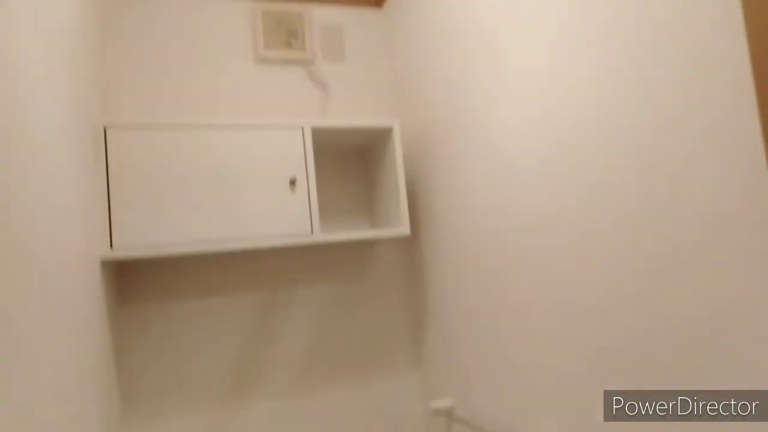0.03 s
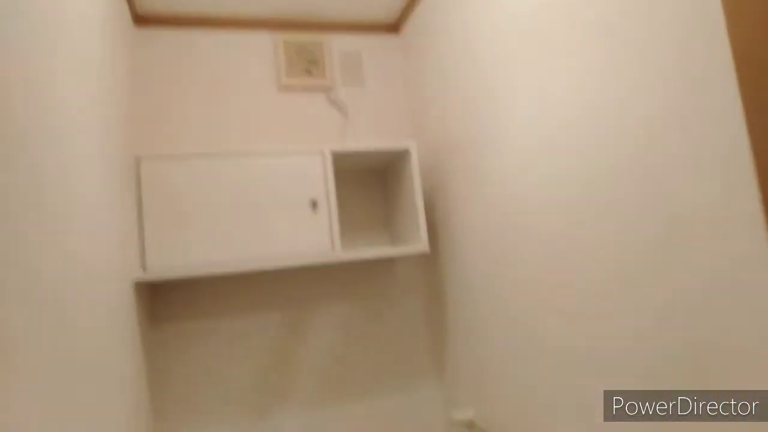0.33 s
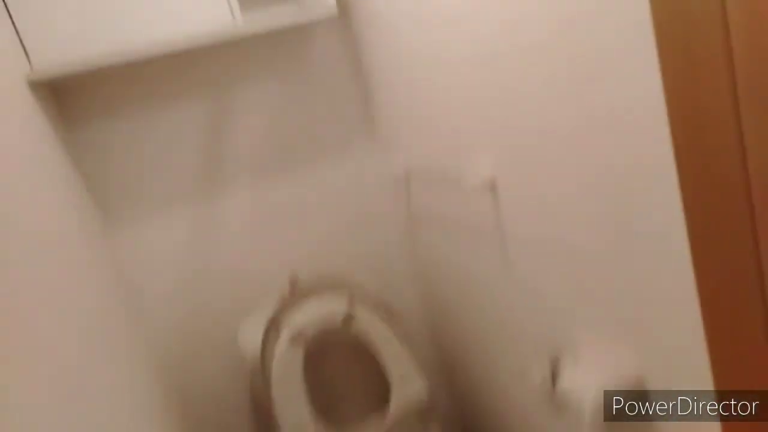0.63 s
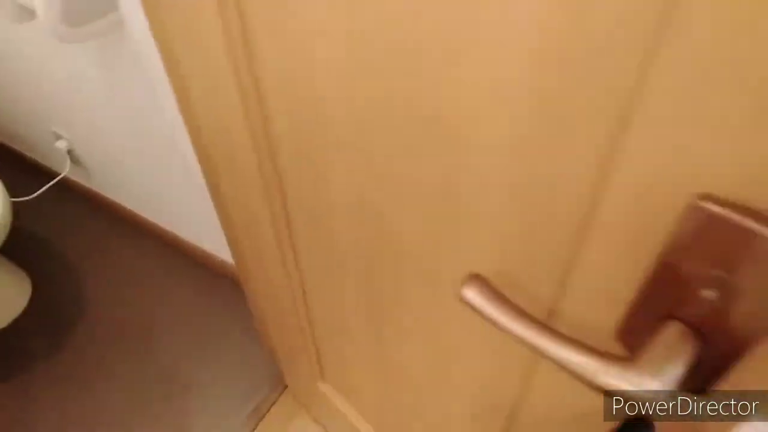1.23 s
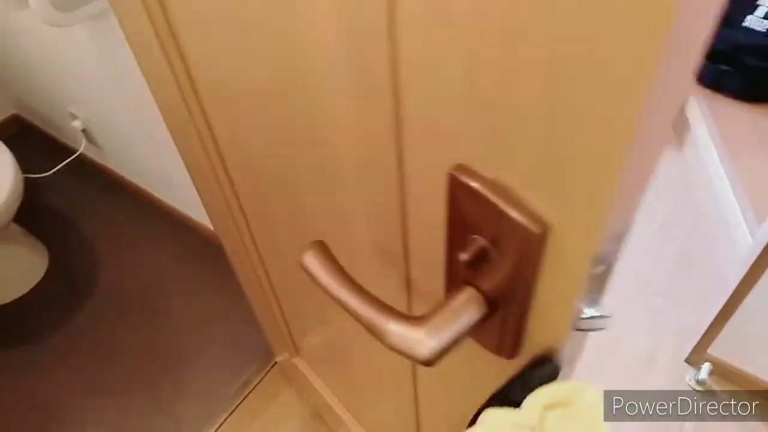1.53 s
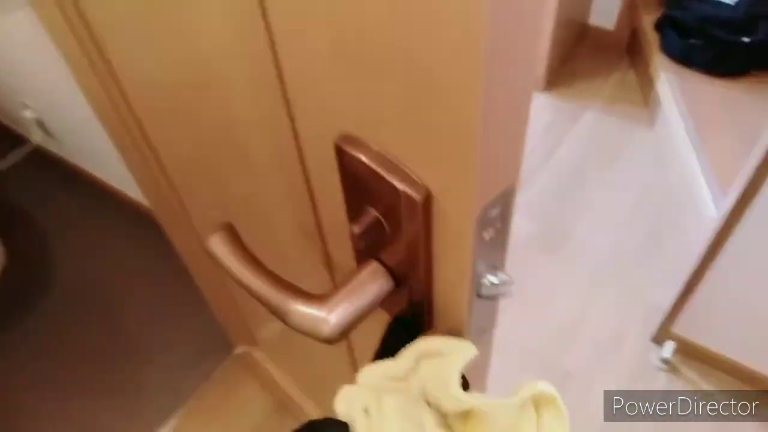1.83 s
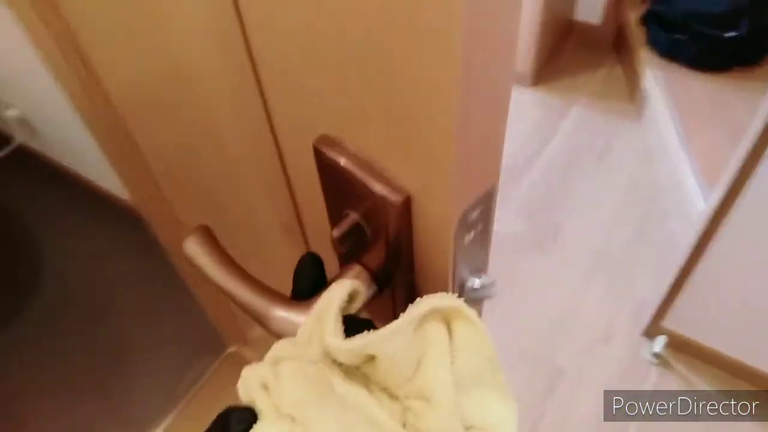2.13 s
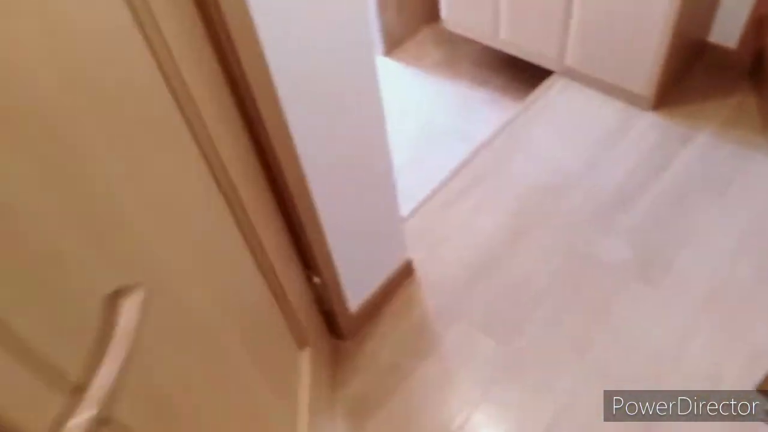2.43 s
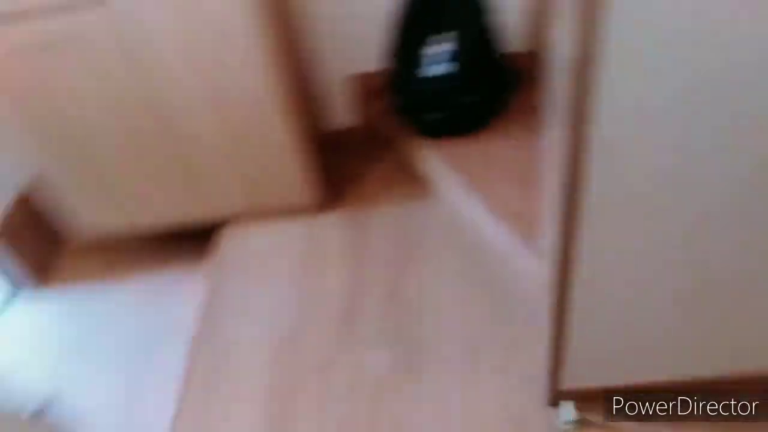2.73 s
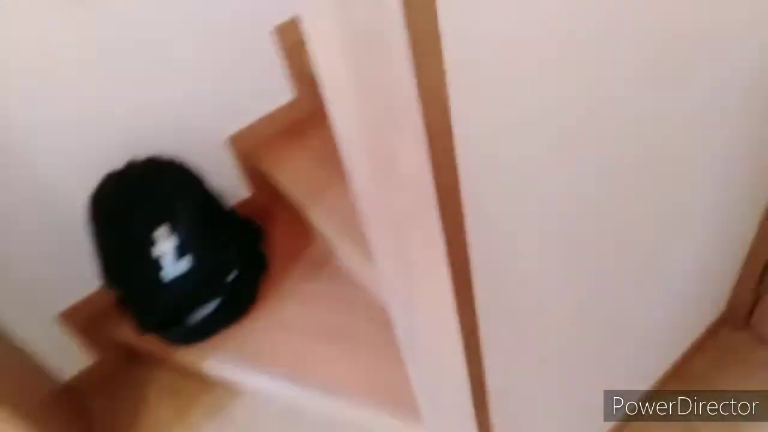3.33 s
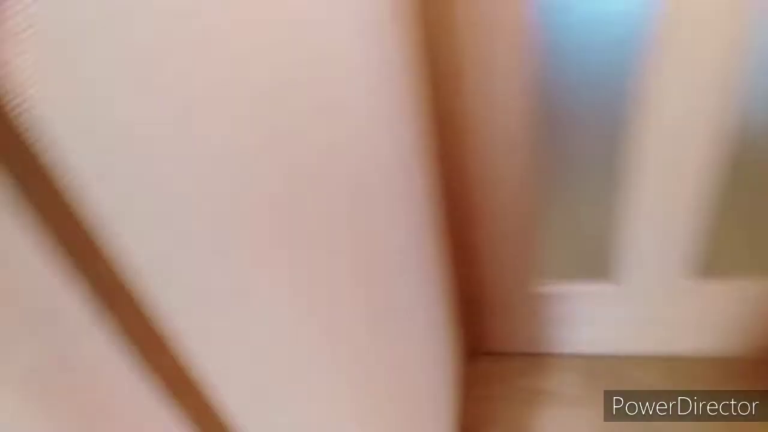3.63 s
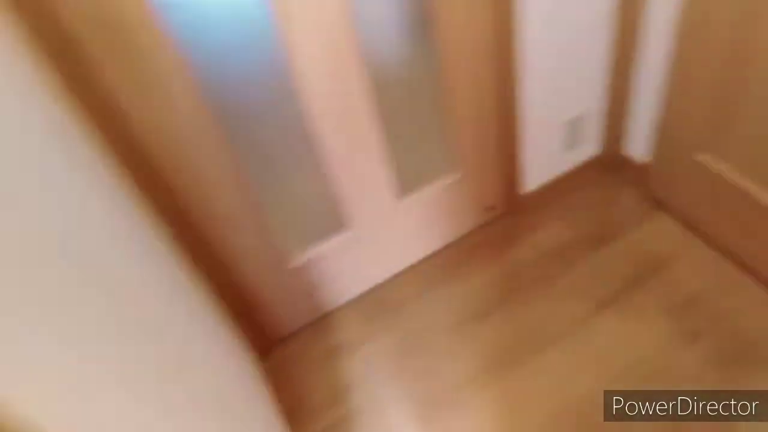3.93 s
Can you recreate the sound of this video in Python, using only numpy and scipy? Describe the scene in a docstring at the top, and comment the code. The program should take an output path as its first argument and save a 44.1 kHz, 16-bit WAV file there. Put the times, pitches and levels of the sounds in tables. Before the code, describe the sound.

Water splashes and drips into a toilet tank in a small restroom, then dies away. A door handle clicks lightly, cloth brushes past, and the door thumps shut close by, with soft footsteps over a faint fan hum.

```python
"""Water splashes into a toilet cistern in a small, hard-walled restroom and dies away: its impacts
hiss and ring the basin, and trapped bubbles plink. A hand holding a towel works the door handle,
cloth brushes past the door, and the door swings shut: the latch rides over its plate, then the leaf
thumps into the frame and rings in its modes. Soft footfalls bump the wooden floor. Behind it all
a little fan spins up, humming at its blade rate over the hiss of the ventilation."""
import sys
import numpy as np
from scipy import signal
from scipy.fft import rfft, irfft
from scipy.io import wavfile

SR = 44100
rng = np.random.default_rng(int(sys.argv[2]) if len(sys.argv) > 2 else 0)


def pcm_store(signal):
    """Save signal as 16-bit PCM."""
    levels = np.round(np.clip(np.atleast_2d(signal), -1, 1) * 32767)
    wavfile.write(sys.argv[1], SR, levels.astype(np.int16).T)


N = 176400
T = np.arange(N) / SR


def water():
    """Impact and resonance: splatter, basin modes and bubbles follow the flow; the tank murmurs below."""
    # loudness of the flow: t/s, level/dB
    flow = [(0, -33.5), (.12, -35.5), (.27, -35.5), (.44, -38.5), (.5, -42), (.6, -40.5), (.7, -40),
            (.77, -47.5), (.92, -47), (1.12, -53), (1.3, -61.5), (1.6, -66.5), (2.2, -82)]
    # splash spectrum: f/Hz, density level/dB
    splash_spectrum = [(150, -13.5), (400, -11.5), (750, -9), (900, -11.5), (1170, -4), (1550, -9),
                       (2200, -4), (2700, 4), (4300, 0), (5600, -4.5), (7500, -8.5), (9400, -12.5),
                       (12300, -4.5), (15500, -18.5)]
    # cavity modes of the basin: f/Hz, level/dB
    basin_modes = [(760, -2), (1168, -9), (1792, 3.5), (2131, 3), (2275, -2.5), (2510, 5.5), (2747, -1),
                   (3338, -6), (3800, -7)]
    # murmur of the water in the tank: t/s, level/dB
    murmur_level = [(0, -64), (.5, -54.5), (.95, -51.5), (1.15, -55.5), (1.35, -60.5), (2, -60.5)]
    # its spectrum: f/Hz, density level/dB
    tank_spectrum = [(100, -27), (200, 2.5), (350, 7.5), (600, -1), (1200, 5.5), (2500, -0.5), (6000, -56)]
    spray = splatter()
    splash = from_db(-2.5) * colour(spray, splash_spectrum)
    basin = from_db(-12.5) * resonate(spray, basin_modes, t60=0.13)
    murmur_gain = from_db(in_time(murmur_level)[0] + 2 * drift(13))
    murmur = murmur_gain * colour(rng.standard_normal(N), tank_spectrum)
    pour = room(splash + basin + from_db(-8) * bubble_cloud(), wet_db=-1)
    return murmur + from_db(in_time(flow)[0]) * pour


def splatter(splats_per_s=500, spread_db=5.5):
    """Shot noise: each band has its own random splats over a fine spray, swelling in spurts."""
    out = 0
    edges = np.geomspace(140, 17000, 13)
    for low, high in zip(edges, edges[1:]):
        sizes = from_db(spread_db * np.minimum(rng.exponential(1, N), 4)) * rng.choice([-1, 1], N)
        splats = from_db(-2.5) * rms_one(sizes * (rng.random(N) < splats_per_s / SR))
        spray = from_db(-5) * rng.standard_normal(N)
        spurts = from_db(1.5 * drift(14))
        out = out + bandpass((splats + spray) * spurts, low, high)
    return rms_one(out)


def bubble(hz, t60, rise=0.093):
    """Minnaert resonance: trapped air rings, rising in pitch as it nears the surface."""
    t = T[:int(t60 * SR) + 2]
    return np.sin(2 * np.pi * hz * t * (1 + rise * t / t60)) * dying(t, t60)


def bubble_cloud(per_s=300, centre_hz=3613, spread_octaves=0.856, ring_cycles=35):
    """Superposition: many small bubbles of equal Q, ringing at random times, merge into a fizz."""
    out = np.zeros(N)
    for when, pitch, size in rng.random((int(per_s * T[-1]), 3)):
        hz = centre_hz * 2 ** (spread_octaves * (2 * pitch - 1))
        db = 3 * min(-np.log(size), 3.5)
        add(out, when * T[-1], from_db(db) * bubble(hz, ring_cycles / hz))
    return rms_one(out)


def drops():
    """Air entrainment: as the stream breaks up, each larger drop sets one bubble ringing."""
    # plinks and glugs: t/s, f/Hz, level/dB, T60/s
    plinks = [(.018, 3504, -28.5, 0.092), (0.047, 3920, -28, 0.043), (0.31, 2570, -30.5, 0.059),
              (.322, 2110, -28, 0.071), (0.336, 5460, -31.5, 0.044), (0.383, 5330, -23.5, 0.022),
              (.418, 1137, -36, 0.16), (.506, 4660, -37, 0.025), (.528, 1820, -38.5, 0.084),
              (0.543, 4370, -25, 0.034), (0.61, 2620, -38, 0.072), (0.6526, 4450, -18, 0.016),
              (.655, 3930, -25.5, 0.023), (.654, 2460, -34, 0.038), (.793, 794, -29.5, 0.041),
              (.808, 900, -40.5, .08), (.815, 738, -40.5, 0.074), (.925, 341, -45.5, 0.11),
              (.975, 332, -45, .08), (1.044, 3200, -38, 0.036), (1.11, 1437, -43, 0.11),
              (.096, 5280, -30, .03), (.81, 4900, -38, .03), (1.315, 5800, -51, .04)]
    out = np.zeros(N)
    for s, hz, db, t60 in plinks:
        add(out, s, from_db(db) * bubble(hz, t60))
    return room(out, wet_db=-4)


def door(soft_contact_s=0.0023):
    """Modal vibration: each contact rattles the latch and pushes the leaf, which rings freely."""
    # contacts as the door shuts: t/s, clatter level/dB, clatter T60/s, thump level/dB
    contacts = [(3.003, -30, 0.071, -45), (3.0097, -25, 0.053, -47), (3.0204, -19, .025, -12),
                (3.032, -42, .06, -32), (3.043, -29.5, .05, -24)]
    # latch spectrum: f/Hz, density level/dB
    latch_spectrum = [(250, -11), (500, -5), (650, -5.5), (900, -5), (1450, -0.5), (2100, -9), (2700, -8),
                      (3900, -3.5), (5000, -12), (6500, -14), (9500, -24.5), (12700, -19), (15500, -37)]
    # modes of leaf and frame: f/Hz, level/dB, T60/s
    leaf_modes = [(33, -13, 0.34), (46.1, -12.5, 0.33), (78.5, -13.5, 0.15), (108.4, -16.5, .14),
                  (118, -10.5, 0.23), (144, -20.5, 0.3), (221, -22, 0.23), (273, -23, 0.41),
                  (324, -32, .15), (368, -21.5, 0.15), (426.6, -19.5, 0.3), (475, -31, .15),
                  (858, -25, .09), (1190, -44, .15), (1302, -22, 0.092), (1500, -26, 0.23),
                  (1645, -26, 0.11)]
    clatter, pushes = np.zeros(N), np.zeros(N)
    for s, clatter_db, t60, thump_db in contacts:
        add(clatter, s, from_db(clatter_db) * crack(t60, snap=3.2))
        add(pushes, s, from_db([thump_db]))
    leaf = sum(from_db(db) * damped_mode(hz, t60, soft_contact_s) for hz, db, t60 in leaf_modes)
    thump = signal.fftconvolve(pushes, leaf)[:N]
    return room(colour(clatter, latch_spectrum), wet_db=-2) + thump


def clicks():
    """Impulsive radiation: splats and hard parts give a snap that fills the room and a dry crackle."""
    # ticks of water, then of handle and latch: t/s, level/dB, lower edge f/Hz
    ticks = [(0.087, -19, 9000), (.229, -21, 8000), (.329, -20, 10000), (.379, -31, 8000),
             (.428, -22.5, 7000), (.571, -27, 10000), (.623, -28, 7000), (.651, -20.5, 4020),
             (1.157, -27.5, 11000), (1.165, -27, 11000), (1.219, -41, 10300), (1.249, -36.5, 10000),
             (1.6378, -32.5, 2960), (1.649, -36, 3000), (1.888, -38.5, 7000), (1.896, -42, 6940),
             (1.933, -47, 2500), (2.0751, -33.5, 5900), (2.279, -39, 1200), (2.855, -44.5, 803),
             (2.873, -39.5, 10000), (3.251, -39, 4000), (3.9, -51.5, 3020)]
    # their common spectrum: f/Hz, density level/dB
    tick_spectrum = [(300, -26), (1500, 9), (3200, 11.5), (6000, 2.5), (8500, -4.5), (12500, 2.5),
                     (15500, -15)]
    snaps, crackles = np.zeros(N), np.zeros(N)
    snap = 6.8 * signal.unit_impulse(256)
    for s, db, hz in ticks:
        highpass = signal.butter(2, hz, "high", fs=SR, output="sos")
        add(snaps, s, from_db(db) * signal.sosfilt(highpass, snap))
        add(crackles, s, from_db(db - 5.5) * signal.sosfilt(highpass, crack(t60=0.034, snap=0)))
    return colour(room(snaps, wet_db=1.5) + crackles, tick_spectrum)


def swishes():
    """Modulated noise: slopping and rubbing give short grainy swells, each in its own band."""
    # water, then hand and feet: t/s, duration/s, level/dB, centre f/Hz, width/octaves
    swells = [(0.198, 0.077, -40.5, 636, 3.8), (0.408, 0.053, -40, 1750, 1), (0.802, 0.077, -50, 830, 0.26),
              (.825, 0.038, -46, 1720, 1.4), (1.056, 0.04, -44, 4860, 1.4), (1.102, 0.051, -50.5, 2260, 2),
              (1.877, 0.073, -49, 2190, 1.4), (2, 0.023, -54.5, 4290, 0.35),
              (2.038, 0.056, -58, 510.4, 0.64), (2.274, 0.042, -46.5, 1300, 2.1),
              (2.85, 0.046, -47, 960, 2.6), (2.862, 0.082, -51.5, 310.2, 0.26)]
    out = np.zeros(N)
    grid_hz = np.geomspace(30, 20000, 30)
    pink_db = -10 * np.log10(grid_hz)
    for s, length, db, hz, octaves in swells:
        band_db = -28 * np.log10(1 + (np.log2(grid_hz / hz) / octaves) ** 2)
        grain = rng.standard_normal(N) * from_db(0.83 * drift(82))
        swish = rms_one(colour(grain, np.c_[grid_hz, pink_db + band_db]))
        n = int(length * SR)
        add(out, s, from_db(db) * swish[:n] * signal.windows.tukey(n))
    return room(out, wet_db=-6)


def cloth(glide=0.025):
    """Friction noise: cloth slides along the door, with a few faint rings that glide in its hiss."""
    # the stroke: t/s, level/dB
    stroke = [(2.28, -60), (2.33, -54), (2.4, -48), (2.52, -50), (2.64, -49.5), (2.69, -56), (2.8, -69)]
    # friction spectrum: f/Hz, density level/dB
    hiss_spectrum = [(250, -17.5), (500, -6.5), (850, -14), (1380, -6), (1800, -5), (4000, -4.5),
                     (6300, -14.5), (8200, -29.5), (12600, -11.5), (15500, -34)]
    # narrow resonances: f/Hz, level/dB
    ring_modes = [(615, -3), (1230, 7.5), (1375, -1), (2950, 2), (3730, 3), (4150, -2.5)]
    rings = resonate(rng.standard_normal(N), ring_modes, t60=0.1)
    gliding = np.interp(np.cumsum(1 + glide * drift(3)), np.arange(N), rings)
    gain = from_db(in_time(stroke)[0] + 0.95 * drift(25))
    hiss = colour(rng.standard_normal(N), hiss_spectrum)
    return gain * (hiss + from_db(-7.5) * gliding)


def steps():
    """Damped oscillation: the wooden floor gives a low bump under each soft footfall."""
    # footfalls: t/s, level/dB, f/Hz, T60/s
    footfalls = [(2.2, -50, 52.5, 0.46), (2.78, -37, 37.4, 0.24), (2.81, -36.5, 59.7, .15),
                 (3.181, -34, 41.4, 0.27), (3.261, -40, 58, 0.29), (3.461, -46, 33, 0.45)]
    out = np.zeros(N)
    for s, db, hz, t60 in footfalls:
        add(out, s, from_db(db) * damped_mode(hz, t60, attack_s=0.011))
    return out


def fan(pitch_wander=0.0142, waver_db=5.5):
    """Blade-passing tone: wavering harmonics of the blade rate climb as the fan spins up."""
    # course of the fan: t/s, blade-passing f/Hz, level/dB
    spin_up = [(0, 40.3, -91), (.45, 60.55, -58), (.75, 88, -57.5), (1, 118, -71), (1.17, 135.8, -56),
               (1.35, 132.5, -66), (2, 127.5, -62.5), (2.2, 124.6, -53), (2.3, 126, -60.5),
               (2.45, 126, -53.5), (2.65, 125.6, -56), (3, 125.9, -59.5), (3.7, 124, -71), (4, 121, -58.5)]
    # harmonics: order, level/dB
    harmonics = [(1, -3), (3, -18), (4, -16.5)]
    hz, db = in_time(spin_up)
    phase = 2 * np.pi * np.cumsum(hz * (1 + pitch_wander * drift(11.7))) / SR
    hum = 0
    for order, order_db in harmonics:
        gain = from_db(db + order_db + waver_db * drift(10))
        hum = hum + gain * np.sqrt(2) * np.sin(order * phase)
    return hum


def ventilation():
    """Duct resonance: moving air hisses and excites the modes of the fan's duct."""
    # duct modes: f/Hz, level/dB
    duct_modes = [(280, -6.5), (385, -7.5), (515, 4), (555, 2), (705, 4), (812, -3), (908, 3), (992, 3.5),
                  (1230, -34), (1375, -3)]
    # their ringing, muffled once the door is shut: t/s, level/dB
    duct_level = [(0, -72), (1.1, -62.5), (2.1, -61), (2.7, -62), (3.3, -72), (4, -68.5)]
    # air hiss, dipping after the door shuts: t/s, level/dB
    air_level = [(0, -64), (1.4, -57), (2.1, -58), (2.75, -55.5), (3.1, -53), (3.55, -56.5), (3.7, -58.5),
                 (4, -56)]
    # its spectrum: f/Hz, density level/dB
    air_spectrum = [(20, 2.5), (50, -1), (85, -0.5), (130, 2.5), (190, -22.5), (280, -12), (440, -20),
                    (530, -14), (700, -12), (1000, -21), (1500, -20.5), (3000, -17), (5000, -21.5),
                    (8500, -32), (12500, -33.5), (15500, -36)]
    duct = from_db(in_time(duct_level)[0]) * resonate(rng.standard_normal(N), duct_modes, t60=0.11)
    hiss = from_db(in_time(air_level)[0]) * colour(rng.standard_normal(N), air_spectrum)
    return duct + hiss


def room(x, wet_db):
    """Reverberation: a dense tail follows the direct sound, each octave dying at its own rate."""
    # reverberation time: f/Hz, T60/s
    decay_times = [(100, 0.42), (500, 0.28), (3000, 0.33), (8000, 0.28), (15000, 0.37)]
    t = T[:SR * 2 // 3]
    edges = np.geomspace(60, 18000, 9)
    tail = 0
    for low, high in zip(edges, edges[1:]):
        band = bandpass(rng.standard_normal(len(t)), low, high)
        tail = tail + band * dying(t, at_hz(decay_times, np.sqrt(low * high)))
    tail = tail * np.clip(t / 0.001 - .5, 0, 1)   # reflections begin after 0.5 ms
    reflections = signal.fftconvolve(x, tail / np.linalg.norm(tail))[:N]
    wet = from_db(wet_db)
    return (x + wet * reflections) / np.hypot(1, wet)


def crack(t60, snap):
    """Hard impact: an impulse of height snap, then decaying noise."""
    t = T[:SR // 4]
    return rng.standard_normal(len(t)) * dying(t, t60) + snap * (t == 0)


def damped_mode(hz, t60, attack_s):
    """Free vibration: a decaying sine whose onset is rounded by a soft contact."""
    t = T[:SR]
    return np.sin(2 * np.pi * hz * t) * dying(t, t60) * (1 - np.exp(-t / attack_s))


def resonate(x, modes, t60):
    """Forced vibration: x drives a set of modes; unit rms."""
    t = T[:SR // 2]
    response = sum(from_db(db) * np.cos(2 * np.pi * hz * t) for hz, db in modes) * dying(t, t60)
    return rms_one(signal.fftconvolve(x, response)[:N])


def colour(x, spectrum):
    """Minimum-phase filtering to the given spectrum; white noise keeps its level."""
    size = 8192
    gain = rms_one(from_db(at_hz(spectrum, np.fft.rfftfreq(size, 1 / SR))))
    cepstrum = irfft(np.log(gain))
    cepstrum[1:size // 2] *= 2   # folding the cepstrum makes the filter causal
    cepstrum[size // 2 + 1:] = 0
    return signal.fftconvolve(x, irfft(np.exp(rfft(cepstrum))))[:N]


def bandpass(x, low, high):
    """Butterworth band-pass, edges in Hz."""
    return signal.sosfilt(signal.butter(2, [low, high], "band", fs=SR, output="sos"), x)


def drift(hz):
    """Random fluctuation: noise low-passed at hz; unit rms."""
    hop, settle = 40, 2000
    pole = np.exp(-2 * np.pi * hz * hop / SR)
    noise = rng.standard_normal(N // hop + settle + 2)
    slow = signal.lfilter([1], [1, -2 * pole, pole * pole], noise)[settle:]
    return np.interp(np.arange(N) / hop, np.arange(len(slow)), rms_one(slow))


def dying(t, t60):
    """Exponential decay, 60 dB in t60 seconds."""
    return np.exp(-np.log(1000) * t / t60)


def from_db(db):
    """Decibels to gain."""
    return 10 ** (np.asarray(db) / 20)


def rms_one(x):
    """Scale to unit rms."""
    return x / np.sqrt(np.mean(x ** 2) + 1e-20)


def in_time(rows):
    """Interpolate a curve's columns at every sample."""
    s, *columns = np.transpose(rows)
    return [np.interp(T, s, c) for c in columns]


def at_hz(points, hz):
    """Interpolate a table on a log-frequency axis."""
    table_hz, values = np.transpose(points)
    return np.interp(np.log(hz + 1e-3), np.log(table_hz), values)


def add(out, s, x):
    """Mix x into out from time s."""
    i = int(np.clip(s * SR, 0, N - 1))
    out[i:i + len(x)] += x[:N - i]


def scene():
    """Superposition: all sources sum at one microphone."""
    return (water() + drops() + swishes() + clicks() + cloth() + door() + steps() + fan()
            + ventilation())[None]


def record(dry, cutoff_hz=15650):
    """Band limiting: an elliptic low-pass cuts the top steeply."""
    return signal.sosfilt(signal.ellip(12, .1, 70, cutoff_hz, fs=SR, output="sos"), dry)


dry = scene()
out = record(dry)
pcm_store(out)
```